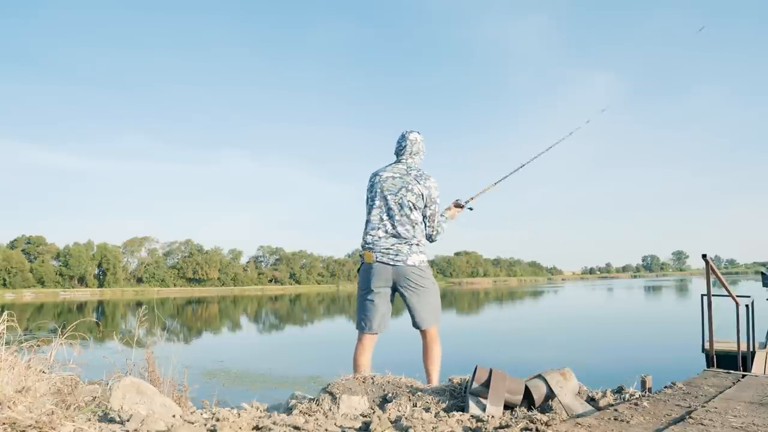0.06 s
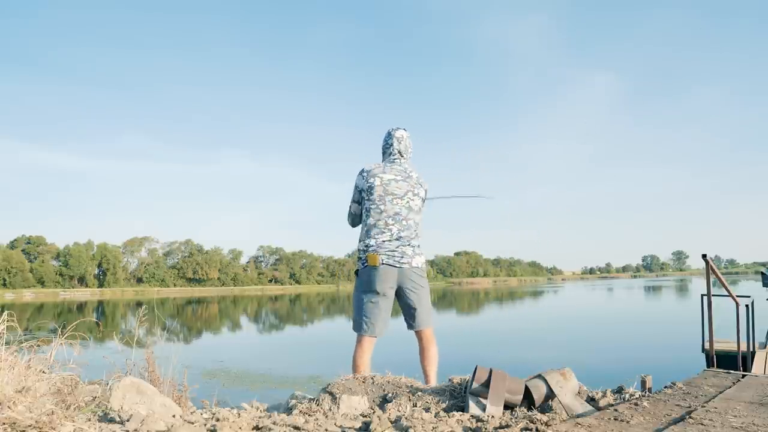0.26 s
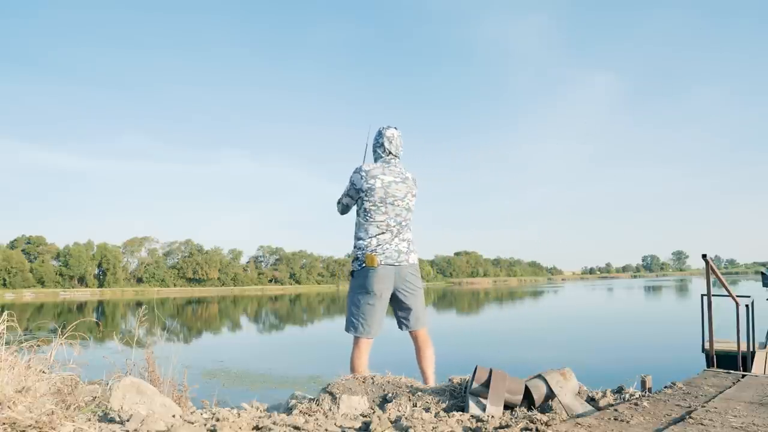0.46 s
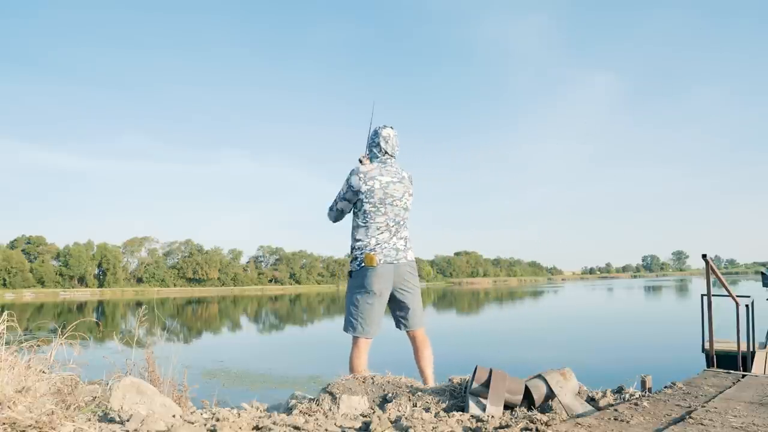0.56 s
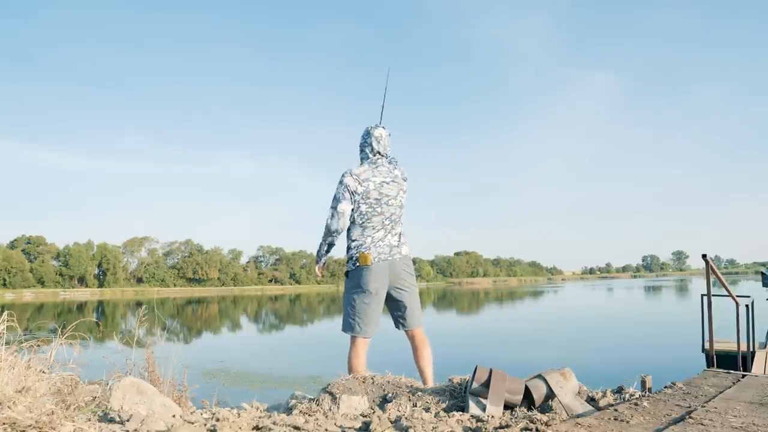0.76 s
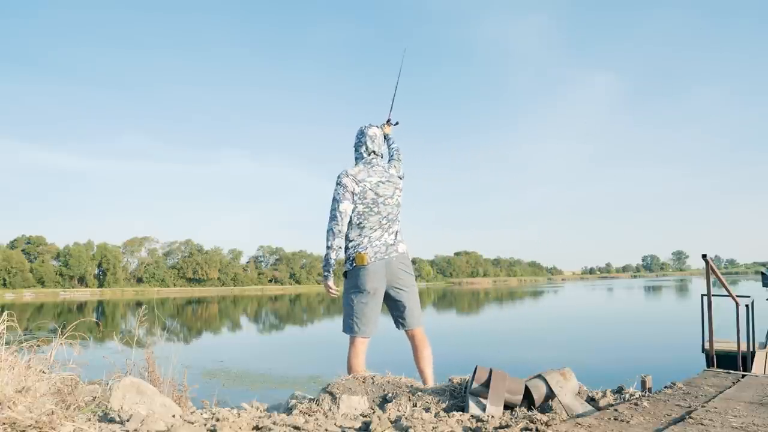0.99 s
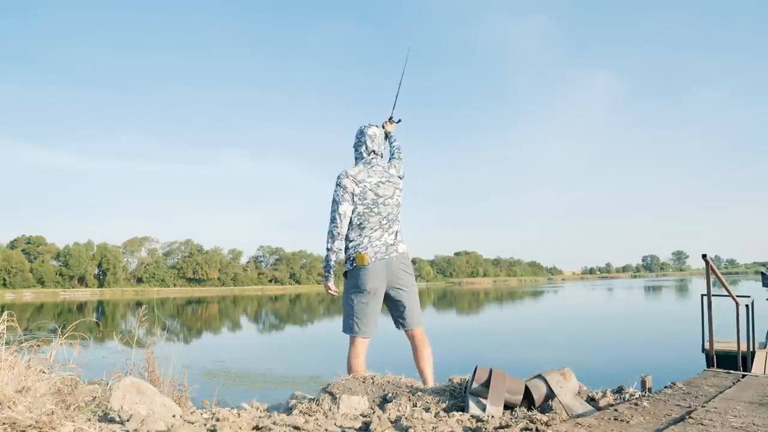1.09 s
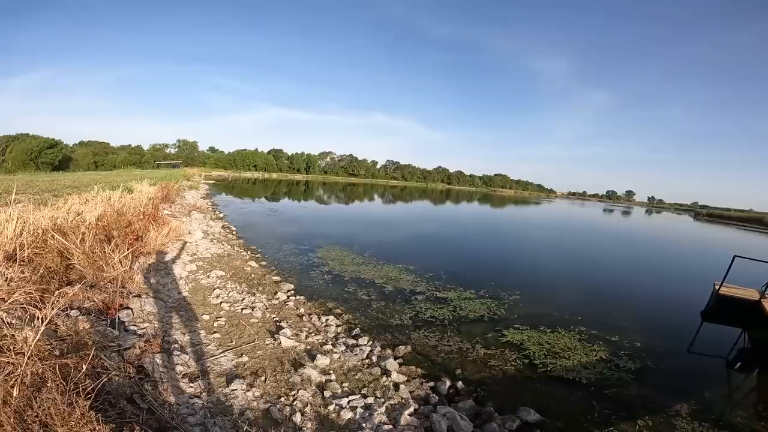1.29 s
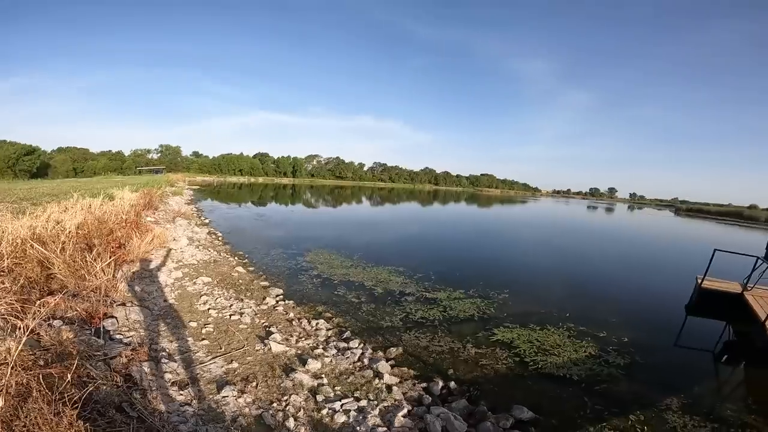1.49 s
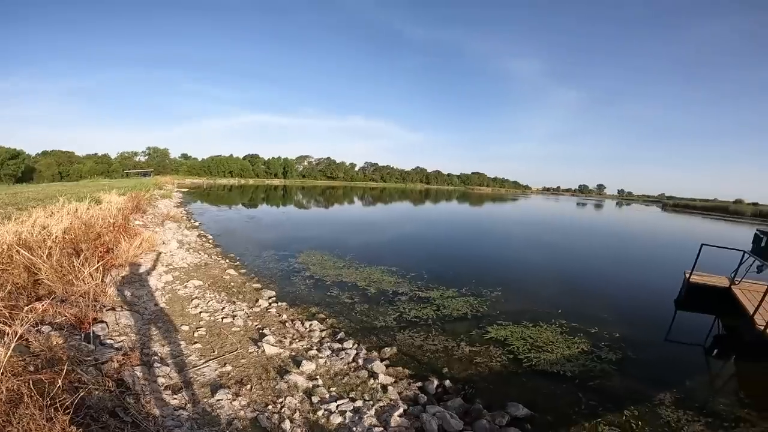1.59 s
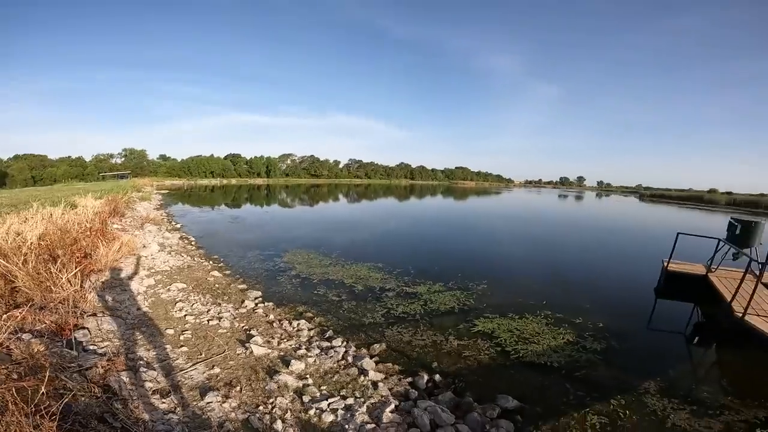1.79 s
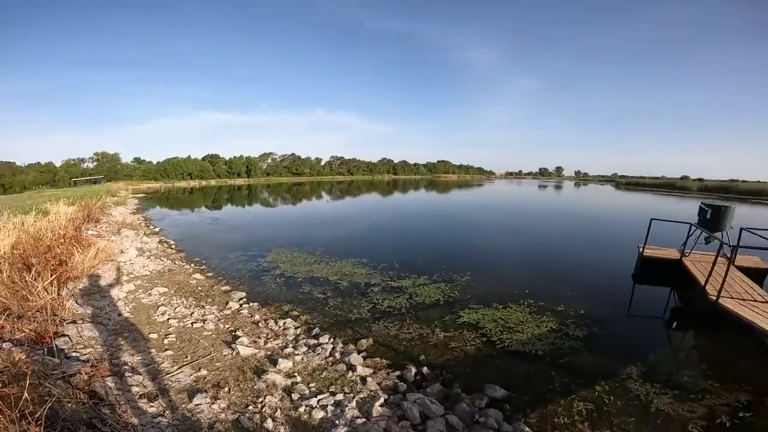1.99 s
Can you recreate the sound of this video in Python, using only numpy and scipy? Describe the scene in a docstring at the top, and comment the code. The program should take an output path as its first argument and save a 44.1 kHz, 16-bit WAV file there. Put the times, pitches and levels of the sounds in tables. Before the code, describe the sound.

A fishing rod whips through the air in one short, sharp swish with reel clicks and a dull jolt, then line hisses off the spool and fades; quiet lakeside, close stereo microphone.

```python
"""One cast of a fishing rod

Close to a small stereo microphone on a lake bank, the reel ticks, air puffs hit the ports (the first
mostly on the right), the mount jolts and rings, and the rod swishes as shaped noise under the line's
narrow-band whistle. Then line hisses off a spool of wavering tones. Wind, a far drone and a faint hiss,
all filtered noise, lie under it; clothing rustles at the start and the end."""
import sys
import numpy as np
from scipy import signal
from scipy.fft import rfft, irfft, next_fast_len
from scipy.io import wavfile
from scipy.ndimage import uniform_filter1d, map_coordinates

SR = 44100
rng = np.random.default_rng(int(sys.argv[2]) if len(sys.argv) > 2 else 0)


def voltage_ratio(level):
    """Linear amplitude factor for a level in decibels (scalar or array-like)."""
    return 10 ** (np.asarray(level, float) / 20)


def inscribe(sig):
    """Save sig as 16-bit PCM at rate SR to the path in sys.argv[1].

    A 1-D sig is mono; a 2-D sig holds one channel per row.
    Samples are clipped to [-1, 1] before scaling.
    """
    pcm = np.round(np.clip(np.atleast_2d(sig).T, -1, 1) * 32767)
    wavfile.write(sys.argv[1], SR, pcm.astype(np.int16))


N = 90404
T = np.arange(N) / SR  # time [s]

# left-right correlation of near sounds: (frequency [Hz], correlation)
NEAR_ALIKE = [(200, 0.63), (700, 0.98), (2400, 0.71), (4400, 1), (8000, 0.98), (14000, 0.35)]
# left-right correlation of far sounds: (frequency [Hz], correlation)
FAR_ALIKE = [(200, 0.55), (500, 0.25), (1300, 0.25), (5000, 0.73), (14000, 0.41)]


def unit(x):
    """Normalization: scales a signal to rms 1."""
    return x / np.sqrt(np.mean(x ** 2) + 1e-20)


def along(points, hz):
    """Logarithmic frequency scale: interpolates (frequency [Hz], value) points."""
    f, v = np.transpose(points)
    return np.interp(np.log(hz + 1), np.log(f + 1), v)


def level(rows, col=1, fade_s=.03):
    """Amplitude envelope: gain from a dB column, dropping 30 dB beyond both ends."""
    s, db = np.transpose(rows)[[0, col]]
    times = np.r_[s[0] - fade_s, s, s[-1] + fade_s]
    levels = np.r_[db[0] - 30, db, db[-1] - 30]
    return voltage_ratio(np.interp(T, times, levels))


def wobble(rate):
    """Random modulation: a smooth curve through random knots, rate knots a second."""
    knots = rng.standard_normal(int(N * 400 / SR) + 4)
    return map_coordinates(knots, [T * np.clip(rate, 0, 400)])


def filtered(x, response):
    """Linear filtering: multiplies the spectrum of x by a response of frequency."""
    m = next_fast_len(N + SR // 4)
    return irfft(rfft(x, m) * response(np.fft.rfftfreq(m, 1 / SR)), m)[..., :N]


def rush(spectrum, patchy_db, alike=NEAR_ALIKE):
    """Random noise: stereo, of rms 1, patchy in time and frequency, partly correlated."""
    z = signal.stft(rng.standard_normal((2, N)), nperseg=256)[2]
    field = rng.standard_normal(z.shape[1:])
    field = uniform_filter1d(uniform_filter1d(field, size=5, axis=0), size=5, axis=1)
    pair = signal.istft(z * voltage_ratio(patchy_db * unit(field)), nperseg=256)[1][:, :N]

    def mid_side(hz):
        # cos(2 * angle) is the left-right correlation
        angle = np.arccos(np.clip(along(alike, hz), -1, 1)) / 2
        return voltage_ratio(along(spectrum, hz)) * [np.cos(angle), np.sin(angle)]

    mid, side = filtered(pair, mid_side)
    return unit(np.array([mid + side, mid - side]))


def narrow(hz, width_hz):
    """Quadrature modulation: shifts low-pass noise to a moving pitch, at rms 1."""
    band = filtered(rng.standard_normal((2, N)), lambda f: np.exp(-(f / width_hz) ** 2))
    phase = 2 * np.pi * np.cumsum(hz) / SR
    return unit(band[0] * np.cos(phase) + band[1] * np.sin(phase))


def rustle():
    """Dry friction: rubbing cloth gives grainy broadband noise."""
    # clothing early and late: (time [s], level [dB])
    early = [(0, -71), (.04, -60), (.24, -63.5)]
    late = [(1.85, -73), (1.89, -64.5), (1.93, -58.5), (1.97, -60.5), (2.05, -58)]
    # spectrum of cloth: (frequency [Hz], relative density [dB per Hz])
    cloth = [(200, -10), (450, -2.5), (2500, -3.5), (8000, -10), (16000, -23)]
    return (level(early) + level(late)) * voltage_ratio(2.2 * wobble(70)) * rush(cloth, patchy_db=2.2)


def wind():
    """Turbulent pressure: slow buffeting of light wind on the ports."""
    # wind strength: (time [s], level [dB])
    strength = [(0, -65), (.4, -52), (.8, -60), (1.1, -69.5), (1.8, -71), (2.05, -53.5)]
    # spectrum of buffeting: (frequency [Hz], relative density [dB per Hz])
    rumble = [(8, 8.5), (20, 4), (40, 1), (70, 0), (120, -43)]
    return level(strength) * rush(rumble, 2, [(30, .3)])


def drone():
    """Diffuse propagation: a far drone is low noise only partly correlated between the ports."""
    # drone strength: (time [s], level [dB])
    strength = [(0, -53.5), (.04, -54.5), (.16, -65.5), (.55, -56), (1.05, -60.5), (1.65, -61),
                (2.05, -59.5)]
    # spectrum of the drone: (frequency [Hz], relative density [dB per Hz])
    tone = [(40, -52), (70, -5.5), (118, -15.5), (150, -5.5), (220, -2), (310, -8), (800, -16.5),
            (1400, -17), (6000, -31)]
    return level(strength) * voltage_ratio(.5 * wobble(12)) * rush(tone, 1.2, FAR_ALIKE)


def hiss():
    """Random noise: a faint high hiss with a slowly changing level."""
    # hiss strength: (time [s], level [dB])
    strength = [(0, -66), (.3, -61), (.5, -59.5), (1.26, -59.5), (1.3, -62.5), (2.05, -61.5)]
    # spectrum of the hiss: (frequency [Hz], relative density [dB per Hz])
    spectrum = [(2000, -8), (4500, -17.5), (7400, 2), (16000, 0.5)]
    return level(strength) * rush(spectrum, 1.8, FAR_ALIKE)


def ticks():
    """Impulsive excitation: reel and tackle give short bright bursts of decaying noise."""
    # small ticks: (time [s], peak level [dB], decay time to 1/e [s], treble tilt [dB per octave])
    clicks = [(.0992, -37, .0011, 0), (.1285, -42, .0011, -3), (.1805, -37.5, .0017, -1),
              (.3232, -22, .0007, -10), (.3482, -26.5, .0007, -5), (.359, -31, .001, -4),
              (.972, -46, .002, 3), (2.0285, -42.5, .006, -6)]
    # spectrum of a tick: (frequency [Hz], relative density [dB per Hz])
    spectrum = [(400, -81), (1500, -7), (3000, 2.5), (6000, 13), (16000, 0.5)]
    out, hz = np.zeros(N + SR), np.fft.rfftfreq(4096, 1 / SR)
    t = np.arange(1024) / SR
    for s, db, decay_s, tilt_db in clicks:
        envelope = np.exp(-t / max(decay_s, 2e-4)) * (1 - np.exp(-t / .00011))
        burst = rng.standard_normal(len(t)) * envelope
        octaves = np.log2(np.maximum(hz, 2000) / 6000)
        colour = voltage_ratio(along(spectrum, hz) + tilt_db * octaves)
        # 64 samples of lead-in leave room for the filter's response ahead of the onset
        burst = irfft(rfft(np.pad(burst, (64, 0)), 4096) * colour)[:len(t)]
        out[round(s * SR) - 64:][:len(t)] += voltage_ratio(db) * burst / np.abs(burst).max()
    return out[:N]


def swish():
    """Vortex shedding: the moving blank sheds turbulent air, a low body and a bright part."""
    # swish strength: (time [s], body level [dB], bright level [dB])
    strength = [(.2, -64.5, -71), (.25, -57.5, -51), (.285, -51.5, -51.5), (.31, -43.5, -48),
                (.345, -40.5, -38), (.375, -41.5, -41.5), (.41, -46, -43), (.435, -50, -46.5),
                (.46, -52, -47), (.49, -57.5, -58), (.56, -60.5, -59.5)]
    # spectrum of the low body: (frequency [Hz], relative density [dB per Hz])
    low = [(60, -45), (100, -6), (190, -7), (350, -1), (900, -11.5), (3500, -28.5)]
    # spectrum of the bright part: (frequency [Hz], relative density [dB per Hz])
    high = [(600, -19), (1200, 1.5), (3500, -4.5), (7000, -7.5), (16000, -14)]
    treble_hz, treble_s, treble_rise_s = 7500, .315, .012
    body = level(strength) * voltage_ratio(2.2 * wobble(90.94)) * rush(low, patchy_db=2.0)
    air = rush(high, patchy_db=2.5)
    # the top opens as the swish swells and stays open
    top = filtered(air, lambda hz: 1 / (1 + (treble_hz / (hz + 1)) ** 8))
    air = air - top * (1 - np.tanh((T - treble_s) / treble_rise_s)) / 2
    return body + level(strength, col=2) * voltage_ratio(1.15 * wobble(152.8)) * air


def puffs():
    """Displaced air: each puff is a short pressure oscillation under an early-peaking arch."""
    # puffs on the ports: (start [s], frequency [Hz], cycles, left level [dB], right level [dB])
    gusts = [(0.204, 18.8, 2, -34, -23.5), (0.307, 31.5, 1.6, -37, -39), (0.888, 27, 2.8, -67, -50),
             (1.37, 33, 3.8, -56, -50), (1.89, 18.5, 0.76, -48, -41.5)]
    out = 0
    for s, hz, cycles, left_db, right_db in gusts:
        u = np.clip((T - s) * hz / cycles, 0, 1)  # progress through the puff
        arch = np.sin(np.pi * u ** .71) ** 2
        out = out + arch * np.cos(2 * np.pi * cycles * u) * voltage_ratio([[left_db], [right_db]])
    return out


def whistle():
    """Aeolian tone: the thin line whistles upward as it speeds up, a rough narrow band."""
    # line whistle: (time [s], frequency [Hz], level [dB])
    path = [(.235, 7700, -64), (.265, 7300, -59), (.3, 8700, -52), (.316, 9600, -51), (.335, 10200, -57),
            (.355, 11000, -64)]
    width_hz, undertone, undertone_db = 520, .8, -6  # undertone is a share of the pitch
    hz = np.interp(T, *np.transpose(path)[:2])
    # a thicker stretch of line whistles lower
    tone = narrow(hz, width_hz) + voltage_ratio(undertone_db) * narrow(undertone * hz, width_hz)
    return level(path, col=2) * voltage_ratio(1.7 * wobble(200.4)) * tone


def mount():
    """Modal ringing: each jolt excites the mount's damped modes, opposite on the two ports."""
    # jolts through the mount: (time [s], level [dB])
    jolts = [(.3414, -16), (.417, -33)]
    # modes of the mount: (frequency [Hz], left level [dB], right level [dB], 60 dB decay time [s])
    modes = [(220, -13, -13, .045), (620, -12, -1, .018), (850, -5, -20, .016), (1500, -4, -4, .012)]
    out = 0
    for s, db in jolts:
        t = np.maximum(T - s, 0)
        for hz, left_db, right_db, t60 in modes:
            envelope = voltage_ratio(db - 60 * t / t60) * (1 - np.exp(-t / .001))
            ring = envelope * np.sin(2 * np.pi * hz * t)
            out = out + ring * [[voltage_ratio(left_db)], [-voltage_ratio(right_db)]]
    return out


def knocks():
    """Damped resonance: dull knocks in the rod's handle are short decaying sines."""
    # handle knocks: (time [s], starting level [dB], frequency [Hz], 60 dB decay time [s])
    blows = [(.358, -32, 930, .06), (.3845, -22, 225, .03), (.401, -32, 640, .035), (.456, -40, 1100, .03)]
    out = np.zeros(N + SR)
    t = np.arange(4096) / SR
    for s, db, hz, t60 in blows:
        envelope = voltage_ratio(db - 60 * t / t60) * (1 - np.exp(-t / .001))
        out[round(s * SR):][:len(t)] -= envelope * np.sin(2 * np.pi * hz * t)
    return out[:N]


def whirr():
    """Frequency modulation: thin spool tones swell, waver, arch in pitch and fade."""
    # tones of the whirring spool: (start [s], end [s], frequency [Hz], level [dB])
    tones = [(.465, .61, 1190, -61), (.45, .615, 1860, -63), (.565, .675, 2070, -60), (.6, .8, 3800, -64)]
    out = 0
    for start, end, hz, db in tones:
        arch = np.sin(np.pi * np.clip((T - start) / (end - start), 0, 1))
        pitch = hz * (1 + .04 * arch + .005 * wobble(40))  # about 4 % higher midway
        phase = 2 * np.pi * np.cumsum(pitch) / SR
        out = out + voltage_ratio(db + 2.5 * wobble(50)) * np.abs(arch) ** .5 * np.sin(phase)
    return out


def payout():
    """Sliding friction: line running off the spool through the rings gives grainy noise."""
    # running line: (time [s], level [dB])
    run = [(.46, -49.5), (.55, -56), (.605, -51), (.655, -50.5), (.69, -53.5), (.76, -56), (.97, -58),
           (1.02, -63), (1.15, -69), (1.27, -75)]
    # spectrum of the line: (frequency [Hz], relative density [dB per Hz])
    spectrum = [(500, -17), (1100, -8.5), (2200, 0), (3200, -4), (4200, 0), (5400, -6), (7600, -1),
                (9500, -8), (12000, -1), (16000, -12)]
    return level(run) * voltage_ratio(1.5 * wobble(121.0)) * rush(spectrum, patchy_db=1.5)


def squeak():
    """Frictional squeal: line in a ring gives a falling narrow band with its octave."""
    # squeak of the line: (time [s], frequency [Hz], level [dB])
    path = [(.632, 4600, -64), (.65, 3750, -58), (.668, 3000, -63)]
    hz = np.interp(T, *np.transpose(path)[:2])
    return level(path, col=2) * (narrow(hz, 250) + narrow(2 * hz, 250))


def ports(air):
    """Stereo reception: the microphone colours sound, and its ports differ in level and phase."""
    # microphone colour: (frequency [Hz], gain [dB])
    colour = [(3000, 1.5), (4300, 2.5), (5200, -4), (6200, 2.5), (7400, 2.5), (8800, -2), (10500, -1),
              (12200, -3.5), (13500, -9.5), (15800, -14.5)]
    # left level minus right: (frequency [Hz], difference [dB])
    lean = [(150, -3), (1500, 0), (4000, -2), (14000, 5)]
    # phase by which the left port leads: (frequency [Hz], lead [rad])
    lead = [(100, 0.28), (1000, -0.67), (3000, -0.64), (5000, -0.57)]
    half = np.array([[.5], [-.5]])

    def response(hz):
        gain = voltage_ratio(along(colour, hz) + half * along(lean, hz))
        return gain * np.exp(1j * half * along(lead, hz))

    return filtered(air, response)


def scene():
    """Superposition: airborne sound enters the ports; wind, puffs and jolts act on them directly."""
    air = rustle() + drone() + hiss() + ticks() + swish() + whistle()
    air = air + knocks() + whirr() + payout() + squeak()
    return ports(air) + wind() + puffs() + mount()


def band_limit(x):
    """A steep low-pass at the top of the band."""
    return signal.sosfilt(signal.butter(12, 15750, fs=SR, output="sos"), x)


def record(dry):
    """Signal chain: the finished mix passes on to the last stage."""
    return band_limit(dry)


dry = scene()
out = record(dry)
inscribe(out)
```